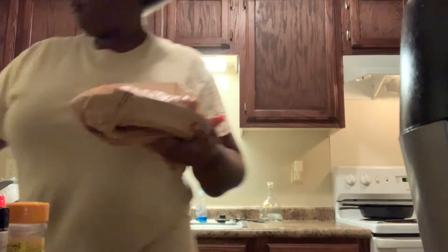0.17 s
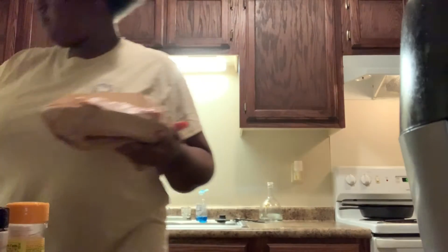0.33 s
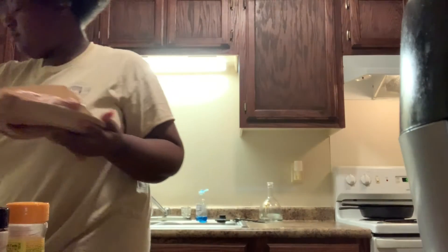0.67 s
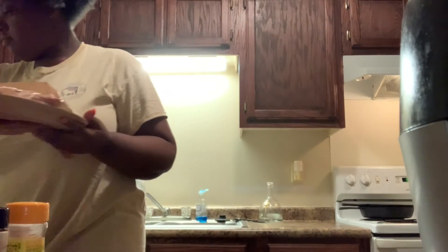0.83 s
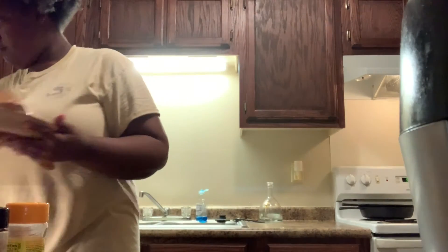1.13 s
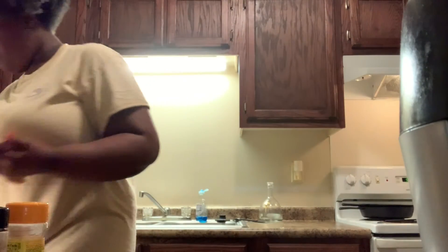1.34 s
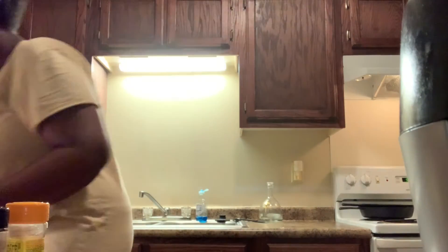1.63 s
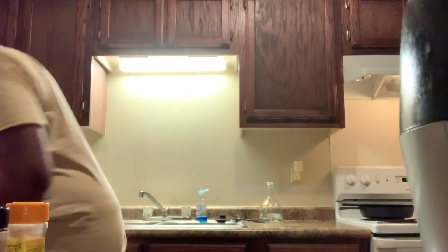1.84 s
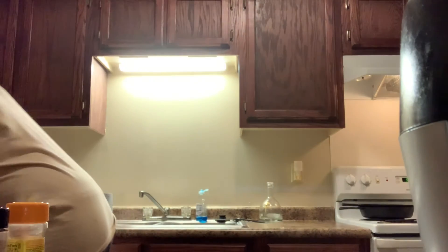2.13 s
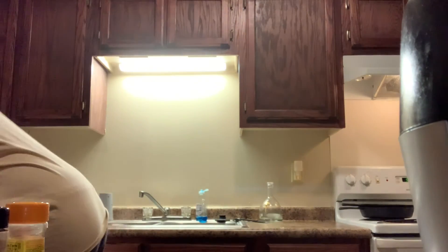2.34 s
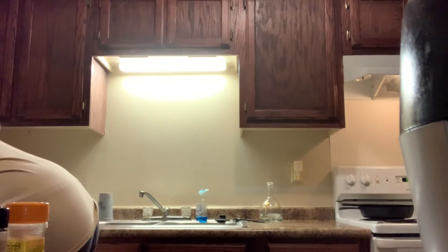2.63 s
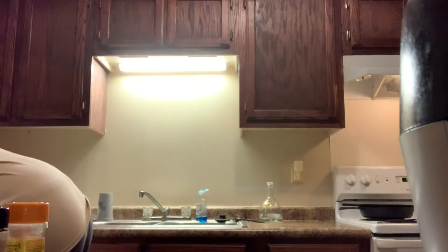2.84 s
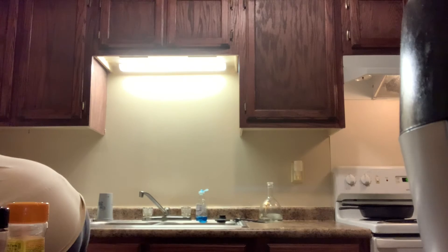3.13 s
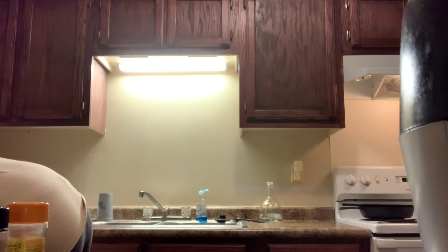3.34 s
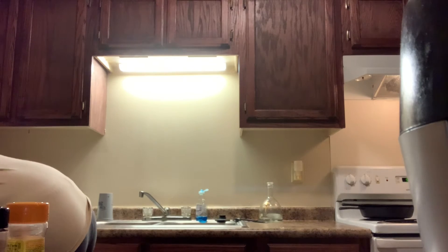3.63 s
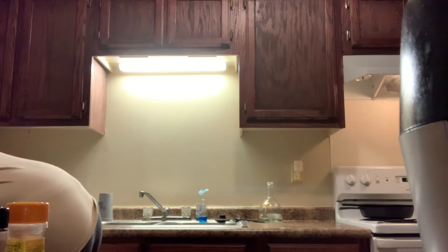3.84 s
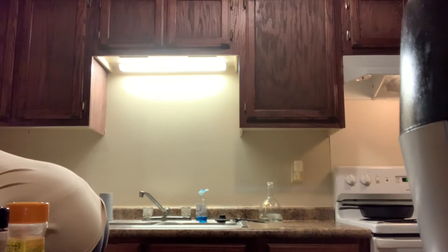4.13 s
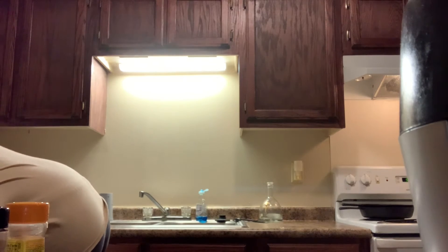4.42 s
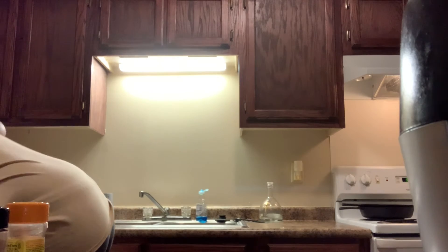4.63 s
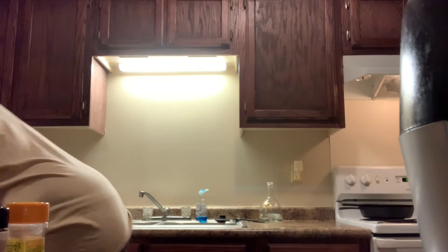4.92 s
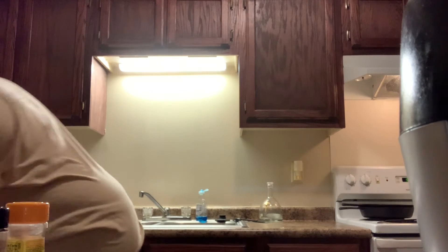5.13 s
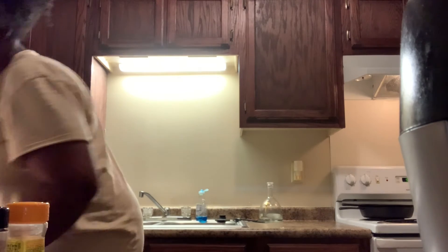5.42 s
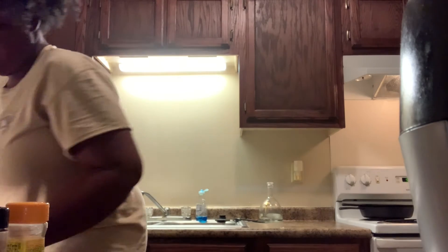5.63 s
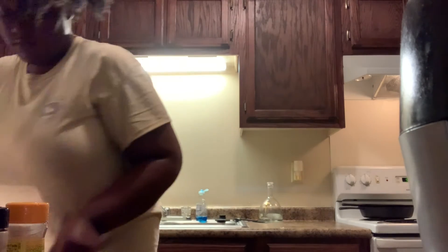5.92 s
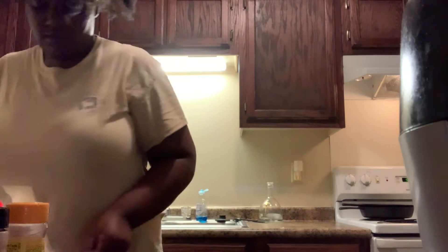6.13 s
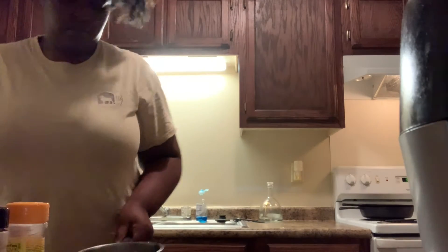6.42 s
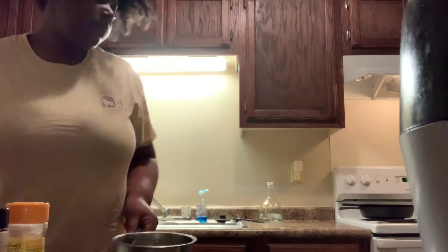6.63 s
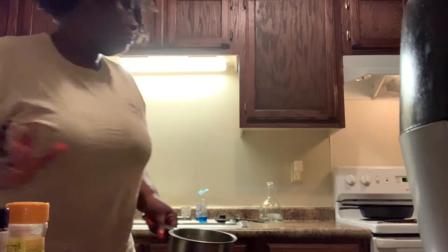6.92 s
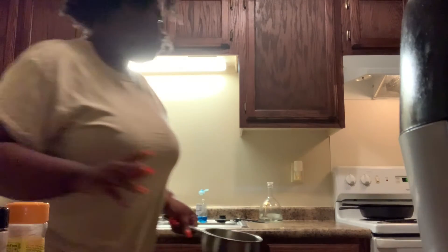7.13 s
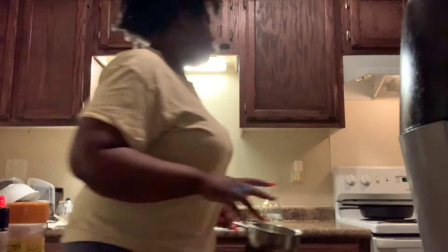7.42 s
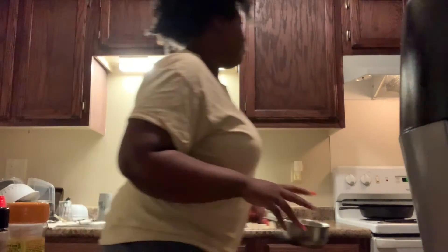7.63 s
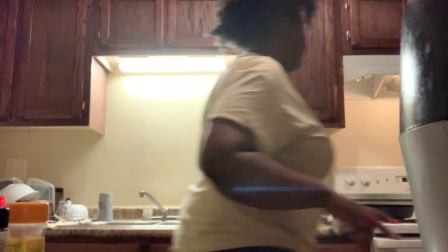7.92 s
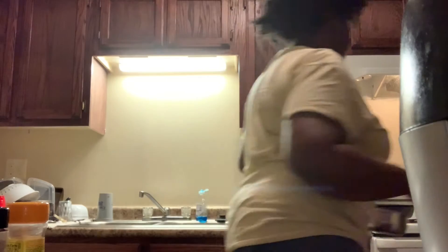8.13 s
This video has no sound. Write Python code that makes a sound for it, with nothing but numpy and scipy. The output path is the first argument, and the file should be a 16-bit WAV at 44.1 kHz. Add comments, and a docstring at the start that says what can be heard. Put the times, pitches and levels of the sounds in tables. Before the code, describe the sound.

A low refrigerator hum with faint wavering and soft room tone runs through the whole 8.5 seconds in a small, lightly reflective kitchen, heard close in stereo. Cloth and crinkly paper rustle from the start; at 0.65-0.9 s two muffled wooden knocks come with a rub and a faint floor thud. Rustling swells around 1.8-2.1 s, then at 3.1 s a wooden cupboard door thumps hard, the loudest sound, rattling and knocking weakly until about 3.7 s amid brisk rustle. A sharp catch click snaps at 3.84 s. Soft knocks near 4.3 s lead to a dry scrape on wood at 4.5 s. It is quiet until about 6 s, with light touches and rubs at 6.2-6.5 s. A metal pan meets the counter with a dull, short clunk at 6.6 s, with a soft floor thud. Faint knocks at 6.8 and 7.1 s and gentle clothing rustle finish.

```python
"""A small home kitchen, heard in stereo by two microphones.
In the background a refrigerator hums as steady and wavering tones over shaped-noise room tone.
Close by, rustle of clothes and paper swells and flickers (random fine clicks) and things rub on wood
(clumped clicks in resonances). Cupboard knocks, a wooden door's hard thump and rattle, its catch and a metal
pan on the counter ring decaying modes with noisy cracks and reflections; weight shifts on the floor."""
import sys
import numpy as np
from scipy import signal
from scipy.fft import rfft, irfft, next_fast_len
from scipy.io import wavfile

SR = 44100
rng = np.random.default_rng(int(sys.argv[2]) if len(sys.argv) > 2 else 0)


def to_linear_factor(level_db):
    """Convert decibel levels (scalar or array-like) to linear amplitude factors."""
    exponent = np.asarray(level_db, float) / 20
    return 10 ** exponent


def bounce(signal):
    """Save signal as a 16-bit WAV file at the path given by the first command-line argument."""
    frames = np.transpose(np.atleast_2d(signal))
    limited = np.clip(frames, -1, 1)
    pcm = np.round(limited * 32767).astype(np.int16)
    wavfile.write(sys.argv[1], SR, pcm)


N = 364707  # length [samples]


def at_hz(points, hz):
    """Read a column on a log-frequency axis; beyond the first and last points their levels hold."""
    table = np.array(points)
    return np.interp(np.log(np.maximum(hz, 1)), np.log(table[:, 0]), table[:, 1])


def rms_one(x):
    """Scale to rms 1."""
    return x / np.sqrt(np.mean(x ** 2) + 1e-20)


def coloured(x, spectrum):
    """Shape the spectrum by a table of (frequency [Hz], gain [dB])."""
    size = next_fast_len(N)
    gain = to_linear_factor(at_hz(spectrum, np.fft.rfftfreq(size, 1 / SR)))
    return irfft(rfft(x, size) * gain, size)[..., :N]


def ring(x, hz, t60):
    """A unit click sets a decaying sine of height about 1 ringing; t60 [s] is its 60 dB decay time."""
    radius = to_linear_factor(-60 / (t60 * SR))
    turn = 2 * np.pi * hz / SR
    return signal.lfilter([0, np.sin(turn)], [1, -2 * radius * np.cos(turn), radius * radius], x + 1e-18)


def swell(x, rise_s, fall_s):
    """A click becomes a bump that rises fast and dies more slowly; energy about 1."""
    up, down = np.exp(-1 / (rise_s * SR)), np.exp(-1 / (fall_s * SR))
    gain = (1 - up) * np.sqrt(1 - down ** 2)
    return signal.lfilter([gain], np.convolve([1, -up], [1, -down]), x + 1e-18)


def grains(per_s, spread_db):
    """Random clicks of uneven size and either sign, in two unrelated draws."""
    unevenness = np.minimum(rng.exponential(1, (2, N)), 4)
    size = to_linear_factor(spread_db * unevenness) * rng.choice([-1, 1], (2, N))
    return size * (rng.random((2, N)) < per_s / SR)


def strokes(rows):
    """Each row swells to its peak and dies away, straight in dB; overlapping rows add in power."""
    swing_db = 20  # gained over the rise time, lost over the fall time
    t, power = np.arange(0, N + 64, 64) / SR, 0
    for s, db, rise_s, fall_s in rows:
        away = np.maximum((s - t) / max(rise_s, 1e-3), (t - s) / max(fall_s, 1e-3))
        power = power + to_linear_factor(db - swing_db * away) ** 2
    return np.interp(np.arange(N) / SR, t, np.sqrt(power))


# refrigerator tones: (frequency [Hz], width [Hz], wavering rms level [dB], steady rms level [dB])
HUM = [(76.8, 9.2, -52.5, -59.5), (118.9, 1.5, -63.5, -47), (156, 13, -61.5, -77.5), (452, 64, -69.5, -76)]
# colour of the kitchen's room tone: (frequency [Hz], gain [dB])
AIR = [(15, -43), (25, -31), (48, -5.5), (70, -12), (91, 3.5), (124, -5), (147, -26.5), (243, -19.5),
       (280, -27.5), (463, -30.5), (632, -31), (695, -34.5), (1260, -37), (1570, -53), (7600, -69),
       (9880, -105), (16700, -120)]
AIR_DB = -50.5  # room tone rms level [dB]


def refrigerator():
    """Motor tones, part steady and part wavering (noise in a narrow resonance), over room tone."""
    # above 16 kHz the last point holds
    air_colour = [(12, -45.5)] + AIR + [(16000, -78)]
    out = to_linear_factor(AIR_DB) * rms_one(coloured(rng.standard_normal((2, N)), air_colour))
    t, lag = np.arange(N) / SR, np.array([[0], [.1]])
    for hz, width, waver_db, steady_db in HUM:
        # one extra second lets the resonance settle
        waver = ring(rng.standard_normal((2, N + SR)), hz, 2.33 / width)[:, SR:]
        out += to_linear_factor(waver_db) * rms_one(waver)
        out += to_linear_factor(steady_db) * np.sqrt(2) * np.sin(2 * np.pi * (hz * t - lag))
    return out


# weight shifting on the floor: (time [s], relative level [dB])
STEPS = [(0.78, -34), (5.82, -41), (6.598, -33), (7.269, -54)]


def steps():
    """A soft push on the floor boards rings their lowest mode."""
    push = np.zeros(N)
    push[[int(s * SR) for s, db in STEPS]] = to_linear_factor(np.array(STEPS)[:, 1])
    soft = np.hanning(700)
    return ring(np.convolve(push, soft / soft.sum())[:N], 34.3, t60=0.5)


# what a rub on wood resonates with: (frequency [Hz], width [Hz], level [dB])
RUBBING = [(480, 346, 1.5), (646, 190, -3), (838, 110, -5.5), (1093, 40, -2.5), (1179, 48, -6.5),
           (1664, 380, -2.5), (2384, 310, -8), (3480, 360, -10.5)]


def rubbing():
    """Stick and slip come in uneven clumps and sound the wood's resonances."""
    clumps = rms_one(swell(rng.standard_normal(N), rise_s=0.0013, fall_s=0.0072))
    slips = grains(1500, spread_db=-1.0) * to_linear_factor(0.57 * clumps)
    out = 0
    for k, (hz, width, db) in enumerate(RUBBING):
        # neighbouring resonances alternate in sign
        out = out + to_linear_factor(db) * rms_one(ring(slips, hz, 2.3 / width)) * (-1) ** k
    return rms_one(out)


# colour of the rustle: (frequency [Hz], gain [dB])
RUSTLE = [(710, -20), (1200, -2.5), (1290, -14), (1630, -1.5), (2140, -5), (2390, 0), (5050, 0.5),
          (7600, -13.5), (9880, -25), (16700, -120)]
# colour of the crisp part: (frequency [Hz], gain [dB])
CRISP = [(6500, -19), (8500, -3.5), (12000, -11), (16000, -1.5)]
# swells of rustle, and short flickers of it: (peak time [s], rustle level [dB], rise [s], fall [s],
# crispness over the rustle before the crisp lift [dB])
RUSTLE_SWELLS = [(0.0, -60.5, .02, 0.29, -10), (.065, -67, 0.021, 0.026, 9.5),
                 (0.121, -62, 0.027, 0.016, -1), (.22, -61, 0.11, 0.56, -0.5), (.35, -63, .3, .3, -15),
                 (.53, -62.5, 0.26, .3, 8), (.71, -50, 0.2, 0.2, -19), (.84, -51, 0.31, 0.054, -8),
                 (1.0, -71.5, 0.54, .3, -10), (1.065, -68.5, 0.037, .04, 3),
                 (1.126, -78, .015, 0.055, 16.5), (1.165, -71.5, .06, .1, 0), (1.23, -68, .08, 0.036, -10),
                 (1.28, -64, 0.041, 0.25, -13), (1.48, -64.5, 0.038, 0.6, 2.5), (1.56, -66, 0.25, .3, -11),
                 (1.79, -54, .28, 0.33, -6.5), (2.11, -58, 0.17, .2, -10), (2.34, -66, 0.13, .9, -6),
                 (2.56, -63.5, .8, .9, -5.5), (2.93, -66, .4, 0.18, -7.5), (3.06, -57, 0.043, 0.48, -1.5),
                 (3.301, -49, 0.22, 0.26, -5), (3.42, -55.5, .3, 0.14, -2), (3.511, -51, .04, 0.17, -3.5),
                 (3.6, -60, 0.27, 0.081, -13), (3.68, -65, .2, 0.058, -20),
                 (3.854, -54.5, 0.0121, 0.11, -6), (3.98, -70, .05, .4, -12), (4.3, -78, 0.046, 0.17, -40),
                 (4.39, -62.5, 0.065, 0.32, -21), (4.555, -52, 0.14, 0.16, -21.5),
                 (4.98, -72.5, .06, 1.5, -10), (5.15, -66, .04, .1, -24), (5.2, -66.5, .05, 0.29, -29),
                 (5.4, -73, 1, 0.065, -7.5), (5.56, -72, 0.052, 0.73, -21), (5.84, -74, 0.14, 0.049, -1.5),
                 (6.021, -58, 0.017, 0.47, -18), (6.21, -63.5, 0.082, .25, -13),
                 (6.38, -64, 0.25, 0.13, -7), (6.599, -53.5, 0.059, 0.24, -18.5),
                 (7.117, -77, 0.049, 0.27, 0.5), (7.26, -58, 0.083, 0.12, -19),
                 (7.475, -62.5, 0.11, 0.19, -10), (7.71, -77.5, 0.1, 0.149, 5),
                 (7.79, -72.5, 0.089, .2, 12), (7.85, -78, .1, 0.17, 15.5), (7.9, -60, 0.025, 0.27, -8),
                 (8.0, -66.5, 0.16, 0.31, -23), (8.09, -60.5, 0.34, 0.124, -21)]
# hands and objects sliding on wood: (peak time [s], level [dB], rise [s], fall [s])
RUBS = [(.53, -56.5, 0.079, 0.17), (.71, -50.5, 0.11, 0.37), (.84, -49.5, 0.25, 0.041),
        (1.05, -78, 0.51, .06), (3.06, -56, .08, .6), (3.3, -59, 0.51, .28), (3.98, -63, 0.03, 1.3),
        (4.33, -52.5, .08, 0.079), (4.49, -46, 0.07, 0.19), (4.58, -44, 0.06, 0.11),
        (5.56, -64.5, 0.1, 0.51), (6.245, -48.5, 0.027, .11), (6.44, -61, 0.11, 0.24),
        (6.5, -44.5, 0.022, 0.067), (6.6, -56.5, 0.19, 0.33), (7.79, -57.5, .03, 0.039),
        (8.0, -56.5, .22, .25)]


def movement():
    """Close by, random fine clicks make the rustle; a slower rub excites the wood."""
    crisp_lift_db, rub_with_rustle_db = 15.5, -5.5  # some wood rub sounds along with all rustle
    rustle = strokes([row[:4] for row in RUSTLE_SWELLS])
    crisp = strokes([(s, db + crisp_db, rise_s, fall_s) for s, db, rise_s, fall_s, crisp_db in RUSTLE_SWELLS])
    slips = grains(9000, spread_db=1.5)
    # the last point holds for everything above 9 kHz
    rustle_colour = [(600, -34.0)] + RUSTLE + [(9000, -32)]
    out = rustle * rms_one(coloured(slips, rustle_colour))
    out += crisp * to_linear_factor(crisp_lift_db) * rms_one(coloured(slips, CRISP))
    rub = np.hypot(strokes(RUBS), to_linear_factor(rub_with_rustle_db) * rustle)
    return out + rub * rubbing()


def blows(events, modes, crack_hz, contact_s, crack_s, above_db, below_db, lowest_hz, cycles, dulls=0):
    """A clean push drives the low modes, a rattling contact the high ones, weighted by the struck spot."""
    s, peak_db, spot_hz, crack_db, soft_db = np.transpose(events)
    at, out = (s * SR).astype(int), np.zeros(N)
    # dulls [octaves per dB]: weaker cracks sit lower
    crack_hz = crack_hz * 2 ** (dulls * (peak_db + crack_db - max(peak_db + crack_db)))
    chatter = rng.standard_normal((2, N))
    for k, (hz, level_db, t60) in enumerate(modes):
        clicks = np.zeros(N)
        clicks[at] = to_linear_factor(peak_db - 12.5 + level_db - soft_db * np.abs(np.log2(hz / spot_hz)))
        rattle = 1 / (1 + (650 / hz) ** 4)  # share of rattling contact
        # the push lasts some cycles, so the mode swells up instead of snapping on
        push = ring(clicks, hz, cycles / hz) * 2 * (1 - to_linear_factor(-60 * hz / (cycles * SR)))
        contact = swell(clicks, 0.0017, contact_s) * chatter[k % 2]
        out += ring((1 - rattle) * push + rattle * contact, hz, t60)
    # the crack is a noise burst in half-octave bands, falling off on both sides of its own colour
    for k, hz in enumerate(500 * np.sqrt(2) ** np.arange(11)):
        octaves, clicks = np.log2(hz / crack_hz), np.zeros(N)
        fall_off = np.maximum(above_db * octaves, -below_db * octaves)
        clicks[at] = to_linear_factor(peak_db + crack_db + 32.0 - fall_off)
        edges = [hz / 2 ** (1 / 4), hz * 2 ** (1 / 4)]
        band = signal.butter(2, edges, "band", fs=SR, output="sos")
        out += signal.sosfilt(band, swell(clicks, 0.0036, crack_s) * chatter[k % 2])
    # little is radiated below the lowest modes
    return signal.sosfilt(signal.butter(3, lowest_hz, "high", fs=SR, output="sos"), out)


# metal pan touching the counter: (time [s], relative level [dB], pitch the struck spot favours [Hz],
# crack relative to the thump [dB], softness away from that pitch [dB per octave])
SET_DOWN = [(6.229, -40.5, 1100, -1, 24), (6.425, -48, 1060, -14.5, 12), (6.481, -33, 640, -8.5, 12),
            (6.593, -16, 1000, -2, 4.8), (6.606, -11.5, 172, -19, 3.85), (6.645, -23.5, 172, -24, 8.9),
            (6.70, -28.5, 160, -30, 12)]
# pan and counter top modes: (frequency [Hz], level [dB], 60 dB decay [s])
PAN = [(63.4, 3, 0.49), (137.7, 7.5, 0.15), (175, -0.5, 0.15), (228.3, 2, 0.096), (317, 1, 0.084),
       (412, 3, 0.067), (645, -2.5, 0.17), (980, -0.5, 0.059), (1074, -7, 0.071), (1050, -24, 0.055),
       (2200, -30, .08), (3350, -23, .06)]


def pan_set_down():
    """Short pushes ring pan and counter top together; lighter touches crack lower."""
    return blows(SET_DOWN, PAN, crack_hz=1750, contact_s=0.039, crack_s=0.025, above_db=4.5, below_db=4.5,
                 lowest_hz=45.1, cycles=1.1, dulls=0.2)


# wooden panel modes, for the knocks and the catch: (frequency [Hz], level [dB], 60 dB decay [s])
WOOD = [(97.8, -4, 0.36), (137, 2.5, 0.19), (155, 5, 0.28), (177.5, -1.5, 0.29), (193.2, -4, 0.19),
        (209.2, -5.5, 0.18), (230, -17.5, 0.56), (260, -7, 0.16), (344, 0.5, 0.14), (376, 1, 0.097),
        (449, -9, 0.26), (482.6, -13, 0.28), (527.4, -6.5, 0.26), (595.3, -8, 0.17), (638, -8.5, 0.19),
        (922.5, -5, 0.14), (1040, -14, 0.29), (1118, -15, 0.24), (1180, -21.5, 0.22), (1550, -23.5, 0.055),
        (2325, -23, 0.12)]
# the door's catch: (time [s], relative level [dB], pitch the struck spot favours [Hz],
# crack relative to the thump [dB], softness away from that pitch [dB per octave])
CATCH = [(3.841, -33.5, 200, -6.5, 2)]


def door_catch():
    """The catch snaps: a bright crack, and the wooden panels ring with it."""
    return blows(CATCH, WOOD, crack_hz=2027, contact_s=0.012, crack_s=0.045, above_db=14.5, below_db=36.0,
                 lowest_hz=83, cycles=5.5)


# blows on cupboards and door: (time [s], relative level [dB], pitch the struck spot favours [Hz],
# crack relative to the thump [dB], softness away from that pitch [dB per octave])
KNOCKS = [(.15, -31.5, 300, -21, 4), (.649, -27, 207, -18, 8), (.695, -15, 200, -23, 11),
          (.729, -28.5, 190, -30, -1.5), (.77, -26, 200, -22, 14), (.846, -18, 260, -33, 1.5),
          (.876, -24, 175, -31, 24), (3.081, -15.5, 260, -2.5, -8), (3.097, -2, 300, -13.5, 5.5),
          (3.119, -4.5, 344, -14.5, 7), (3.151, -7.5, 150, -15.5, 11.5), (3.179, -14.5, 155, -22.5, 1),
          (3.229, -26.5, 165, -25, -3.5), (3.288, -18.5, 156, -28, 6.5), (3.36, -25.5, 205, -13, 13),
          (3.403, -24.5, 175, -28, 9.5), (3.555, -21.5, 209, -21.5, 9.5), (3.621, -26, 180, -42, 14.5),
          (3.692, -34, 175, -30, 10), (4.007, -34, 300, -39, 3.5), (4.279, -36.5, 200, -15, -0.5),
          (4.300, -22, 179.5, -45.5, 18.5), (4.348, -29.5, 175, -38, 22), (6.821, -34.5, 200, -25.5, 2),
          (7.09, -31, 230, -33, 5)]


def cupboards_and_door():
    """Knocks and the door's thump and rattle set wooden panels ringing."""
    return blows(KNOCKS, WOOD, crack_hz=1000, contact_s=0.019, crack_s=0.034, above_db=6.5, below_db=15.0,
                 lowest_hz=83, cycles=5.0)


# the kitchen's reflections: (frequency [Hz], 60 dB decay [s], reflection level [dB])
ROOM = [(60, .5, -11), (300, 0.41, 2), (1000, 0.35, -0.5), (4000, 0.31, 0), (12000, 0.27, -8.5)]


def room(x):
    """Direct sound plus dense reflections that die band by band; two unrelated reflection patterns."""
    t, echo, table = np.arange(SR) / SR, 0, np.array(ROOM)
    edges = 40 * 2 ** np.arange(0, 9.1, .75)
    white = rng.standard_normal((2, SR))
    for low, high in zip(edges, np.minimum(edges[1:], .45 * SR)):
        band = signal.sosfilt(signal.butter(2, [low, high], "band", fs=SR, output="sos"), white)
        hz = np.sqrt(low * high)
        t60 = at_hz(table[:, :2], hz)
        decay = to_linear_factor(at_hz(table[:, ::2], hz) - 60 * t / t60)
        echo = echo + band * decay / np.sqrt(t60 * SR / (6 * np.log(10)))
    echo = echo * np.minimum(t / 0.02, 1)  # reflections build up over 20 ms
    # direct sound, nine samples later in the second view
    echo[0, 0] = 1
    echo[1, 9] = 1.0
    return signal.fftconvolve(x[None], echo, axes=1)[:, :N]


def scene():
    """Two views of the kitchen, sum and difference; the floor's thud is in the sum alone."""
    hits = cupboards_and_door() + door_catch() + pan_set_down()
    return room(hits) + steps() * [[1], [0]] + movement() + refrigerator()


def low_pass(x):
    """Removes everything above the highest recorded frequency."""
    return signal.sosfilt(signal.butter(12, 16490, fs=SR, output="sos"), x)


# sum and difference colour, with thinned treble bands: the sum weak near 9 kHz, the difference
# above 13 kHz: (frequency [Hz], sum gain [dB], difference gain [dB])
STEREO_COLOUR = [(59, 1, -14.5), (117, 0, -13), (200, 10, 2.5), (343, 5, 0.5), (700, 3, 4),
                 (2470, -1.5, -2.5), (6800, -3.5, -3.5), (8200, -14.5, -4), (8240, -21, -11.5),
                 (9400, -26.5, -7), (10560, -11.5, -6.5), (11800, -8.5, -9.5), (13000, -9.5, -34),
                 (15700, -15.5, -25.5), (15900, -59, -60)]


def record(dry):
    """Sum and difference are coloured apart and become left and right; peaks are rounded."""
    left_db, trail_rad, limit = 1.5, 1.24, .92  # left over right, phase trail, ceiling (full scale 1)
    colour = np.array(STEREO_COLOUR)
    total, difference = coloured(dry[0], colour[:, :2]), coloured(dry[1], colour[:, ::2])
    # a source off to one side reaches one microphone later: the difference trails the sum in phase
    analytic = signal.hilbert(difference, next_fast_len(N))[:N]
    difference = np.real(analytic * np.exp(-1j * trail_rad))
    both = np.array([total + difference, total - difference]) * to_linear_factor([[left_db / 2], [-left_db / 2]])
    both = both / (1 + (np.abs(both) / limit) ** 6) ** (1 / 6)
    return low_pass(both)


dry = scene()
out = record(dry)
bounce(out)
```